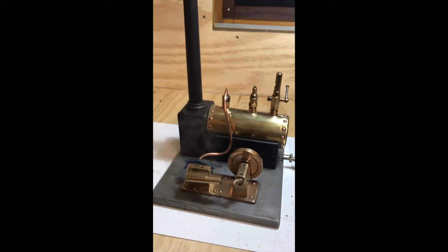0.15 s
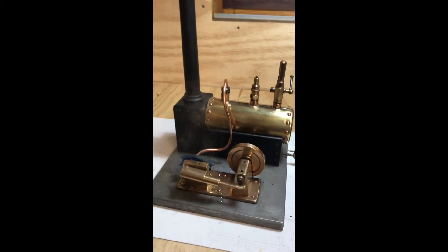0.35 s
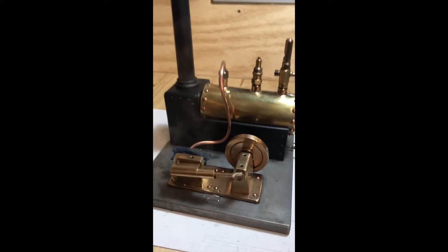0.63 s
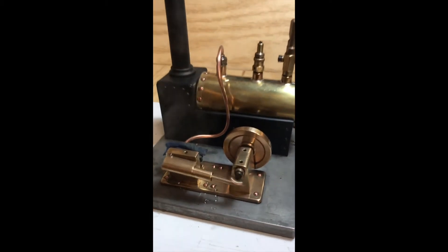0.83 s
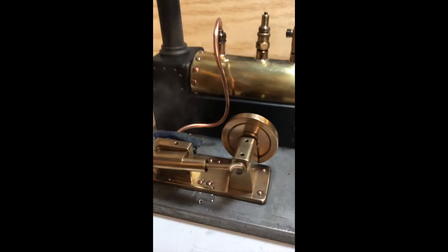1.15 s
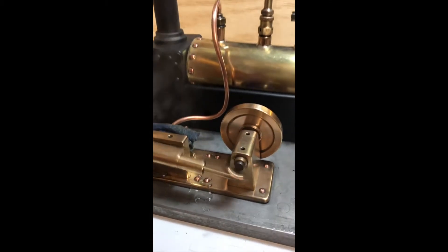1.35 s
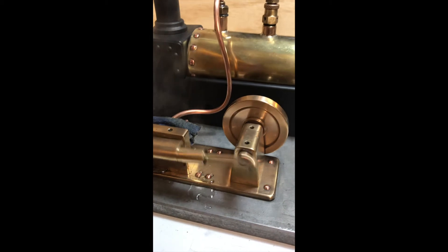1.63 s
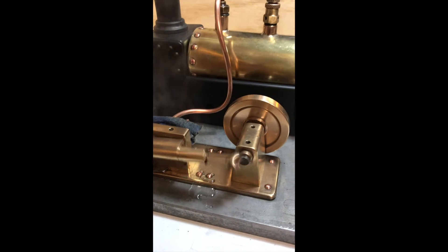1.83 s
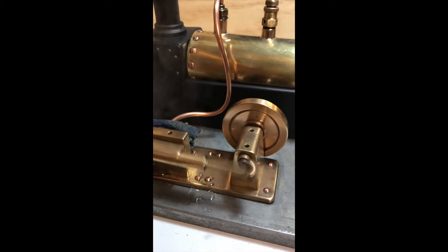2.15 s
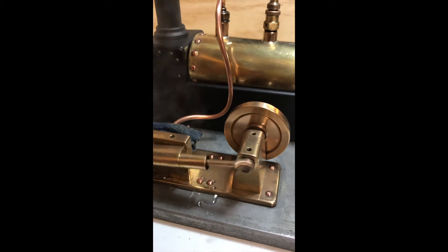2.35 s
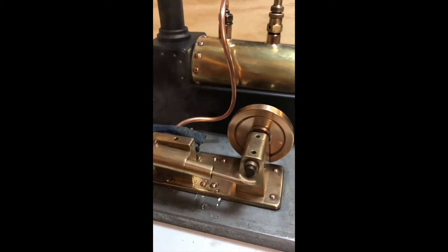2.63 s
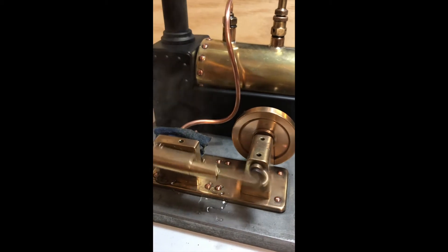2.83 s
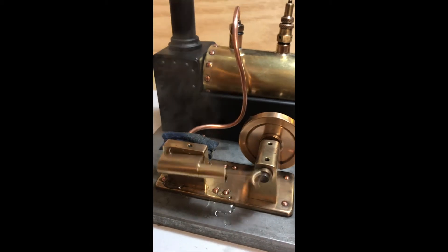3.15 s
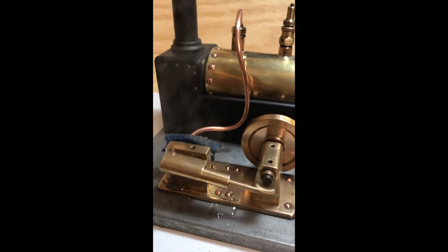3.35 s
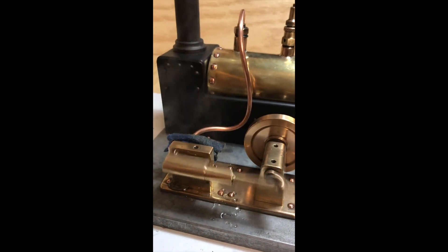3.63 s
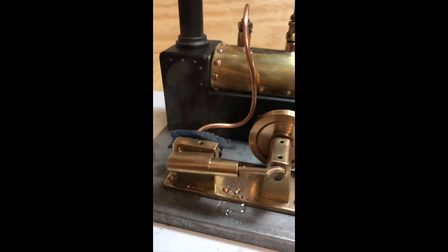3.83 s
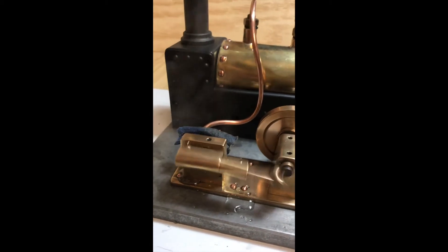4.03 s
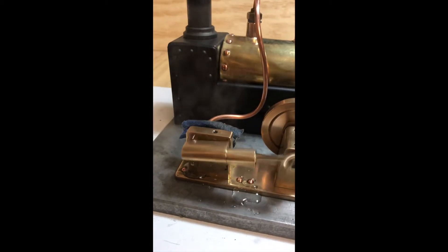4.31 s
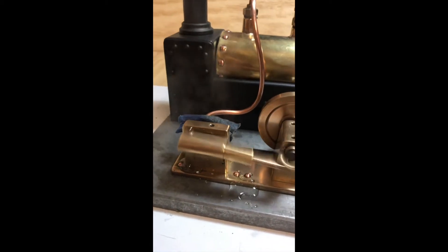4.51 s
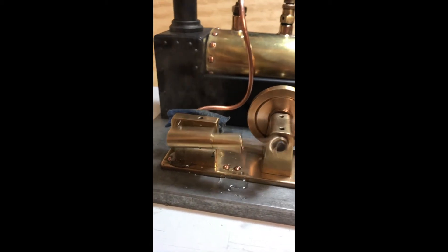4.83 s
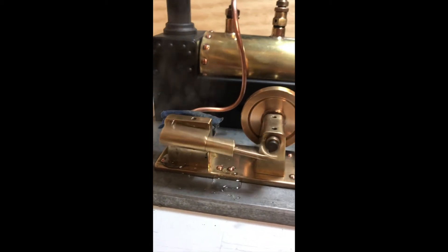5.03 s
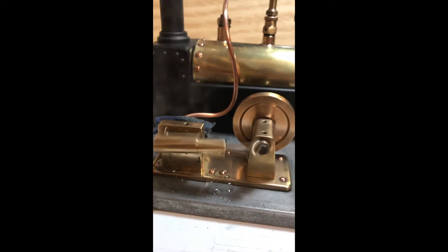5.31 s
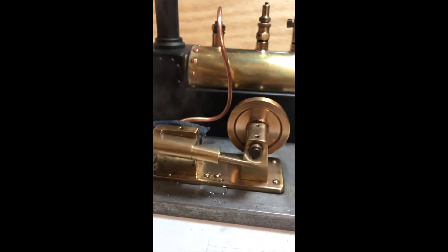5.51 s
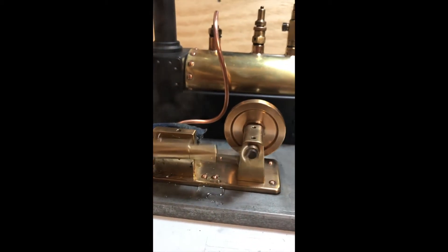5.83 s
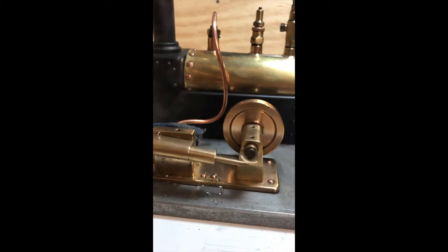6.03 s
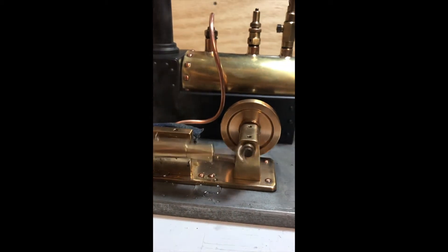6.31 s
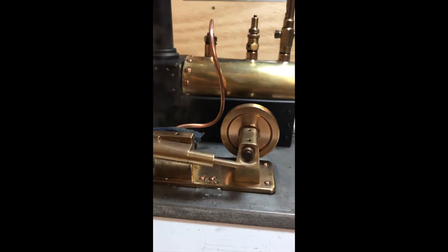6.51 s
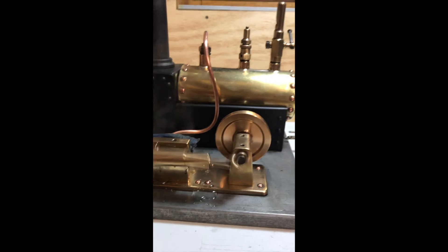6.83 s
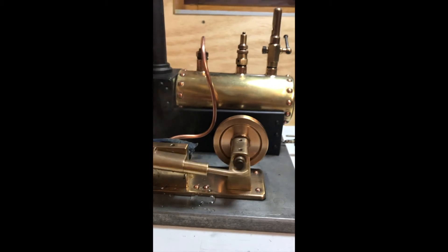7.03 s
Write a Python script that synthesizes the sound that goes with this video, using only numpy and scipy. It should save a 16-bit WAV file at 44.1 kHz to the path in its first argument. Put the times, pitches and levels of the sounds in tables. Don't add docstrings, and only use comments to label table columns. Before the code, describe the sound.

A small brass steam engine runs fast on a bench, its loose crank pin rattling in a rapid bright metallic clatter over faint steam hiss.

```python
import sys
import numpy as np
from scipy import signal
from scipy.io import wavfile
from scipy.ndimage import uniform_filter1d

SR = 44100
rng = np.random.default_rng(int(sys.argv[2]) if len(sys.argv) > 2 else 0)


def pcm_store(signal):
    levels = np.round(np.clip(np.atleast_2d(signal), -1, 1) * 32767)
    wavfile.write(sys.argv[1], SR, levels.astype(np.int16).T)


def volts(x):
    e = np.asarray(x, float) / 20
    return 10 ** e


N = 316197
SPAN = 8192
AGE = np.arange(SPAN) / SR


def evened(x):
    return x / np.sqrt(np.mean(x ** 2) + 1e-20)


def read(points, hz):
    f, value = np.transpose(points)
    return np.interp(np.log(hz + 1), np.log(f + 1), value)


def over_time(points, s):
    return np.interp(s, *np.transpose(points))


def add(mix, s, sound):
    at = round(s * SR)
    part = mix[max(at, 0):][:len(sound) + min(at, 0)]
    part += sound[max(-at, 0):][:len(part)]


def ring(modes, detune=0, uneven_db=0, length=SPAN):
    hz, db, t60 = np.transpose(modes)[:, :, None]
    chance = rng.standard_normal((2, len(modes), 1))
    t = AGE[:length]
    level = volts(db + uneven_db * chance[0] - 60 * t / t60)
    return (level * np.sin(2 * np.pi * hz * (1 + detune * chance[1]) * t)).sum(0)


def noise(spectrum, frame, patchy_db):
    hz = np.fft.rfftfreq(frame, 1 / SR)
    a, b, patches = rng.standard_normal((4 * N // frame + 5, len(hz), 3)).T
    patches = evened(uniform_filter1d(uniform_filter1d(patches, 6, 0), 6, 1))
    z = (a + 1j * b) * volts(read(spectrum, hz)[:, None] + patchy_db * patches)
    return evened(signal.istft(z, nperseg=frame, noverlap=3 * frame // 4)[1][:N])


# frequency in Hz, decay by 60 dB in seconds.
SHED_DECAY = [(500, 0.24), (1500, 0.18), (4000, 0.094), (9000, 0.11), (15000, 0.039)]


def paths(early_db, early_t60, late_db, count=16):
    scatter, walls = rng.standard_normal((2, count, SPAN))
    scatter = scatter * volts(-60 * AGE / early_t60) * np.minimum(AGE / 0.0009, 1)
    hz, t, z = signal.stft(walls * np.minimum(AGE / 0.0045, 1), SR, nperseg=256)
    decay = volts(-60 * t / read(SHED_DECAY, hz)[:, None])
    walls = signal.istft(z * decay, SR, nperseg=256)[1][:, :SPAN]
    return (volts(early_db) * evened(scatter) + volts(late_db) * evened(walls)) / np.sqrt(SPAN)


def reverberate(x, tails):
    return signal.fftconvolve(x, tails[rng.integers(len(tails))])[:SPAN]


# time in seconds, level gained in dB, extra dB from small parts in view.
LEANING = [(0, -3, -2), (.8, -1.5, 0.5), (1.4, 1, 0), (2, 0, 2), (2.6, 0.5, 1), (3.3, 0, 0),
           (4.2, 1.5, 0.5), (4.8, 0, 3), (5.5, -0.5, 1.5), (6.2, 0.5, 3), (6.7, -0.5, 2), (7.2, -0.5, -1.5)]


def near_db(s):
    return np.interp(s, np.array(LEANING)[:, 0], np.array(LEANING)[:, 1])


def in_view_db(s):
    return np.interp(s, np.array(LEANING)[:, 0], np.array(LEANING)[:, 2])


# time in seconds, closeness from 0 (far) to 1 (at the chimney).
CLOSENESS = [
    (0, 0),
    (1.2, 0.01),
    (1.8, 0.04),
    (2.5, 0.32),
    (3.2, 0.57),
    (4.5, 0.54),
    (7.2, 0.49),
]

# time in seconds, speed in turns per second.
FLYWHEEL_SPEED = [(0, 12.8647), (1, 13.1487), (2, 13.4114), (3, 13.6119), (4, 13.8307), (5, 13.9452),
                  (6, 13.9183), (7.2, 13.9883)]


def crank():
    first_blow_s = .0039
    t = np.arange(-SR // 2, N + SR // 10) / SR
    angle = np.cumsum(over_time(FLYWHEEL_SPEED, t)) / SR
    angle -= np.interp(first_blow_s, t, angle)
    return np.interp(np.arange(-2, int(angle[-1])), angle, t)


# frequency in Hz, level in dB per Hz.
RUMBLE_SPECTRUM = [(20, -40), (40, -47), (58, -3), (90, 0), (130, -24), (300, -17), (700, -16.5),
                   (1100, -22), (1600, -41), (4000, -80)]


def room_rumble():
    return volts(-52) * noise(RUMBLE_SPECTRUM, frame=4096, patchy_db=0.0)


# frequency in Hz, level in dB.
HISS_SPECTRUM = [(900, -25), (1300, 3), (2000, -2), (2900, 2), (3600, -1), (4300, 3), (5100, -4), (7000, 1),
                 (10500, -3), (13000, -2), (16000, -1)]
# time in seconds, level in dB.
HISS_DB = [(0, -49), (2.5, -48), (5, -49.5), (7.2, -47.5)]


def steam_hiss():
    t, starts = np.arange(N) / SR, crank()
    angle = np.interp(t, starts, np.arange(len(starts)))
    level_db = over_time(HISS_DB, t) + 3 * np.cos(2 * np.pi * (angle - .38))
    return volts(level_db) * noise(HISS_SPECTRUM, frame=256, patchy_db=3.5)


# middle in seconds, level in dB, pitch in Hz, length in ms.
VALVE_SQUEAKS = [
    (5.236, -42, 4300, 9),
    (5.30, -45, 4400, 20),
    (5.455, -39, 4250, 11),
    (5.97, -42, 4300, 6),
    (1.96, -49, 4000, 18),
    (6.69, -47, 4300, 12),
]


def steam_squeaks():
    out = np.zeros(N)
    for s, db, hz, ms in VALVE_SQUEAKS:
        count = round(2 * ms / 1000 * SR)
        wander = uniform_filter1d(rng.standard_normal(count), 60)
        phase = 2 * np.pi * np.cumsum(hz * (1 + .15 * wander)) / SR
        add(out, s - ms / 1000, volts(db) * np.hanning(count) * np.sin(phase))
    return out


# pitch in Hz, dB heard from afar, dB from close, decay by 60 dB in seconds.
CHIMNEY_MODES = [(181, -63, -50, .45), (293, -62, -55, .3), (360, -55, -55, .06), (438, -48, -59, .14),
                 (540, -60, -56, .2), (690, -58, -55, .12), (808, -62, -55, .4), (950, -49, -58, .1),
                 (700, -48, -46, .02), (1100, -47, -50, .03)]


def exhaust_pops():
    out, starts = np.zeros(N), crank()
    far, close = (ring(np.array(CHIMNEY_MODES)[:, columns]) for columns in ([0, 1, 3], [0, 2, 3]))
    for s, period in zip(starts, np.diff(starts)):
        closeness = over_time(CLOSENESS, s)
        pop = (1 - closeness) * far + closeness * close
        add(out, s + .487 * period, volts(1.2 * rng.standard_normal()) * pop)
    return out


# pitch in Hz, level in dB, decay by 60 dB in seconds.
BENCH_MODES = [(58, -51, .45), (84, -50, .22), (110, -50.5, .18), (139, -56, .25), (222, -60, .15)]
# pitch in Hz, level in dB, decay by 60 dB in seconds.
THUD_MODES = [(160, -48, .035)]


def bench_thumps():
    out, starts = np.zeros(N), crank()
    thump, thud = ring(BENCH_MODES), ring(THUD_MODES)
    for s, period in zip(starts, np.diff(starts)):
        a, b = rng.standard_normal(2)
        add(out, s + .003, volts(1.5 * a) * (thump + volts(2 * near_db(s) + 2) * thud))
        add(out, s + .425 * period, volts(5 + 2 * near_db(s) + 1.5 * b) * thud)
    return out


# time in seconds, level in dB, pitch in Hz, brightness in dB.
PLATE_CLACKS = [(.4058, -19, 1000, -20), (.4125, -15.5, 1200, -18), (.4185, -27, 1250, -20),
                (2.7305, -18, 1100, -6), (2.7385, -12, 1150, -4), (2.7495, -15, 1100, -6),
                (2.878, -22, 900, -10), (5.9125, -18, 1200, 1), (5.918, -17, 1150, -8),
                (6.058, -24, 900, -12), (6.065, -24, 1050, -14), (6.464, -33, 2600, -10),
                (1.974, -35, 1800, -2)]


def plate_clacks():
    out, tails = np.zeros(N), paths(early_db=-10, early_t60=.025, late_db=-16)
    age = AGE[:900]
    for s, db, hz, bright_db in PLATE_CLACKS:
        tock = ring([(hz, 0, .007), (.65 * hz, -6, .008), (1.4 * hz, -9, .005)], length=900)
        edge = np.diff(uniform_filter1d(rng.standard_normal(901), size=3))
        edge = edge * volts(bright_db - 60 * age / .014)
        sound = volts(db) * (tock + edge) * np.minimum(age * hz, 1)
        add(out, s - .001, sound)
        add(out, s - .001, reverberate(sound, tails))
    return out


def rattle(ms):
    u = AGE[:768] * 1000 / ms
    shape = (u / .5) ** 2.4 * np.exp(-u / .24)
    hit, size, sign = rng.random((3, len(u)))
    clumps = volts(4 * evened(uniform_filter1d(rng.standard_normal(len(u)), 28)))
    touches = (hit < 12000 / SR) * np.sign(sign - .5)
    return shape * clumps * touches * volts(-2.5 * np.log(size + .03))


def radiator(modes):
    edges = .9 * modes[0][0], 1.08 * modes[-1][0]
    return np.array(modes), signal.butter(4, edges, "band", fs=SR, output="sos")


def knock(s, db, parts, ms, tails):
    quick, slow = rattle(ms), rattle(1.5 * ms)
    sound, spread = np.zeros((2, 1536))
    for (modes, band), part_db, sideways_db in parts:
        hits = quick if modes[0, 0] > 4000 else .6 * quick + slow
        rung = signal.fftconvolve(hits, ring(modes, detune=.02, uneven_db=1.5, length=769))
        rung = signal.sosfilt(band, rung)
        rung = volts(db) * rung * np.sqrt(.005 * SR / np.sum(rung ** 2))
        sound += volts(part_db) * rung
        spread += volts(.5 * part_db + sideways_db) * rung
    out = reverberate(spread, tails)
    out[:len(sound)] += 0.84 * (sound - 0.4 * np.roll(sound, 17))
    energy = np.cumsum(sound ** 2)
    return s - np.searchsorted(energy, .11 * energy[-1]) / SR, out


def share(rule, extra_db, chance):
    usual_db, loss, scatter_db = rule
    return usual_db - loss * extra_db + scatter_db * chance


def unusual(usual, times, rows):
    rows, out = np.array(rows), usual.copy()
    out[abs(times[:, None] - rows[:, 0]).argmin(axis=0)] = rows[:, 1:]
    return out


SLOP_S = .0003
# time in seconds, blow in dB, cylinder in dB re blow.
ODD_RETURNS = [(.422, -28, -14), (.500, -30, -20), (.576, -32, -18), (1.564, -26, -17), (1.638, -23.2, -30),
               (2.237, -27.5, -20), (2.385, -27, -28), (2.459, -26, -14), (2.533, -26.5, -23),
               (2.680, -22, -20), (2.754, -20.5, -12), (2.828, -21.5, -20), (2.902, -26.5, -13.7),
               (3.122, -24.5, -17), (3.414, -25.5, -27), (3.561, -24, -23), (3.851, -25, -26),
               (4.140, -23, -15), (4.285, -25, -26), (4.645, -27, -34), (4.788, -27, -27),
               (5.003, -23, -19), (5.649, -33, -13), (5.937, -26, -9), (6.008, -34.5, -6),
               (6.080, -23, -12), (6.295, -33, -10), (6.367, -27.5, -23), (6.654, -32.5, -18),
               (7.084, -24.5, -14)]
# dB re blow, dB lost per dB of extra force, scatter in dB.
RETURN_CYLINDER_SHARE = (-18, .6, 4)


def return_blows():
    starts = crank()[2:]
    s = starts[:-1] + .4064 * np.diff(starts)
    slop, force, a = rng.standard_normal((len(s), 3)).T
    extra_db = 1.2 * force
    db = -30.5 + 1.6 * near_db(s) + extra_db
    usual = np.transpose([db, share(RETURN_CYLINDER_SHARE, extra_db, a)])
    return np.column_stack([s + SLOP_S * slop, unusual(usual, s, ODD_RETURNS)])


# time in seconds, blow in dB,
# cylinder in dB re blow, plate in dB re blow.
ODD_POWER_BLOWS = [(1.079, -15, -9.5, -27), (1.382, -14.5, -13, -27), (2.280, -16, -13.5, -28),
                   (2.429, -16, -9.5, -27.5), (2.576, -22, -7, -25.5), (2.650, -18.5, -8.5, -15.5),
                   (2.726, -15.5, -4, -13), (2.871, -18, -9, -17.5), (2.945, -18.5, -7, -18),
                   (3.018, -19, -9, -16.5), (3.166, -16, -11.5, -26), (3.237, -14.5, -20, -32),
                   (4.038, -18.5, -8.5, -16), (4.255, -17.5, -14, -28), (4.327, -19, -11, -21.5),
                   (4.399, -15.5, -17, -28), (4.471, -15, -17, -28.5), (4.543, -14, -21.5, -34),
                   (4.614, -22, -10.5, -19), (4.759, -21, -12, -18.5), (4.831, -20.5, -13, -17),
                   (5.333, -18.5, -7.5, -23.5), (5.405, -21.5, -8.5, -22), (5.476, -16.5, -20, -26.5),
                   (5.907, -19.5, -8, -12.5), (5.979, -23.5, -11, -17), (6.051, -16.5, -11, -23),
                   (6.410, -23.5, -10, -19.4), (6.551, -24.5, -7, -18.5), (7.055, -17.5, -11, -27.5)]
# dB re blow, dB lost per dB of extra force, scatter in dB.
CYLINDER_RULE = (-12, 0.28, 1.4)
SMALL_RULE = (-7.5, .6, 1.8)
PLATE_RULE = (-23.5, 1.3, 1.6)


def power_blows():
    s = crank()[2:]
    slop, force, a, b, c, d = rng.standard_normal((len(s), 6)).T
    usual_db, extra_db = -19 + near_db(s), 1.23 * force
    cylinder_db, plate_db = share(CYLINDER_RULE, extra_db, a), share(PLATE_RULE, extra_db, b)
    usual = np.transpose([usual_db + extra_db, cylinder_db, plate_db])
    db, cylinder_db, plate_db = unusual(usual, s, ODD_POWER_BLOWS).T
    small_db = share(SMALL_RULE, db - usual_db, c) + in_view_db(s)
    rattle_ms = 3.0 + 0.18 * (plate_db - PLATE_RULE[0]) + .45 * d
    rattle_ms = np.clip(rattle_ms, 1.2, 5.2)
    return np.transpose([s + SLOP_S * slop, db, cylinder_db, small_db, plate_db, rattle_ms])


# pitch in Hz, level in dB, decay by 60 dB in seconds.
PIN_MODES = [(5130, -6.5, 0.00055), (6180, -3.5, 0.0037), (7290, 2.5, 0.004), (8320, 5.5, 0.0026),
             (8680, 4.5, 0.0034), (9943, -7.5, 0.01)]
CYLINDER_MODES = [(2600, -9, .006), (2950, -7, .006), (3400, -5, .005), (3900, -3, .005), (4450, 0, .006),
                  (5000, -4, .004)]
SMALL_MODES = [(11170, 14, 0.002), (13550, -7, 0.00068), (12420, 7.5, 0.0052), (13760, 7.5, 0.0015),
               (15200, -6, 0.0069), (16300, -21, 0.0011)]
PLATE_MODES = [(720, -16, .012), (950, -10, .012), (1230, 0, .016), (1650, -2.5, .008), (2150, -.5, .006)]


def crank_pin_knocks():
    out, tails = np.zeros(N), paths(early_db=-12, early_t60=0.044, late_db=-17.0)
    pin_modes, pin_band = radiator(PIN_MODES)
    cylinder, small, plate = map(radiator, (CYLINDER_MODES, SMALL_MODES, PLATE_MODES))

    def pin(s):
        tilt_db = 4 * (over_time(CLOSENESS, s) - .5) * np.sign(pin_modes[:, 0] - 7700)
        return pin_modes + np.outer(tilt_db, [0, 1, 0]), pin_band

    for s, db, cylinder_db, small_db, plate_db, ms in power_blows():
        parts = [(pin(s), 0, -1.5), (cylinder, cylinder_db, -3), (small, small_db, -1.5), (plate, plate_db, -6)]
        add(out, *knock(s, db, parts, 1.2 * ms, tails))
    for s, db, cylinder_db in return_blows():
        small_db = in_view_db(s) - 7
        parts = [(pin(s), 0, -1.5), (cylinder, cylinder_db, -4), (small, small_db, -1.5), (plate, -28, -11)]
        add(out, *knock(s, db, parts, 3.0, tails))
    return out


def scene():
    background = room_rumble() + steam_hiss() + steam_squeaks()
    engine = exhaust_pops() + bench_thumps() + plate_clacks() + crank_pin_knocks()
    return (background + engine)[None]


def roll_off(x):
    return signal.sosfilt(signal.butter(12, 16970, fs=SR, output="sos"), x)


def record(dry):
    dry = signal.sosfilt(signal.butter(4, 44, "high", fs=SR, output="sos"), dry)
    dry = 1.1 * np.tanh(dry / 1.1)
    edge = signal.firwin(201, 15900, window=("kaiser", 7), fs=SR)
    return roll_off(signal.oaconvolve(dry, edge[None], "same"))


dry = scene()
out = record(dry)
pcm_store(out)
```